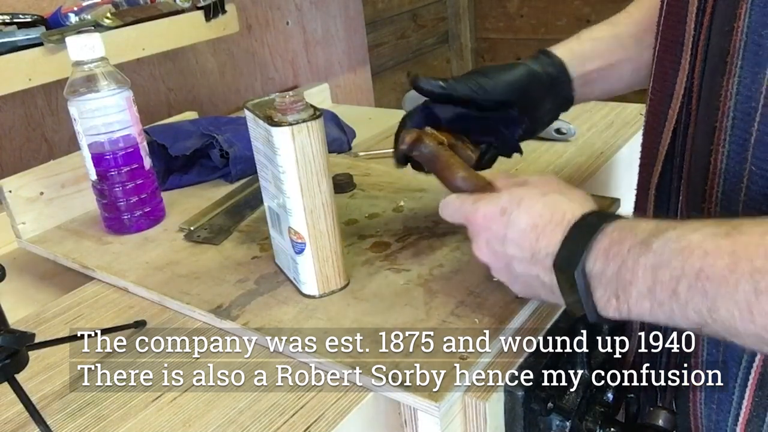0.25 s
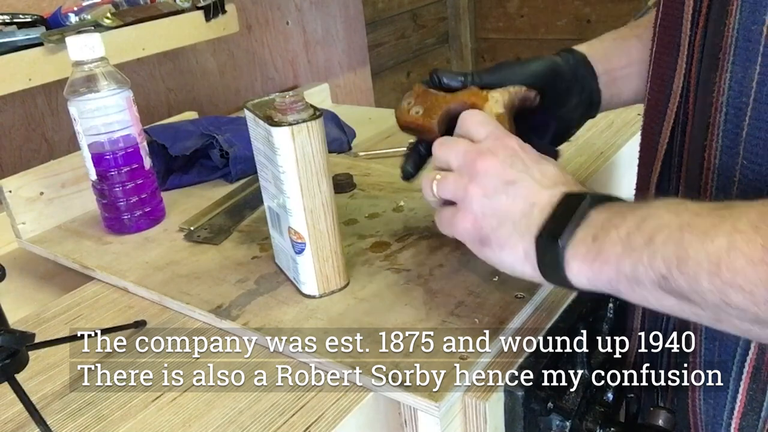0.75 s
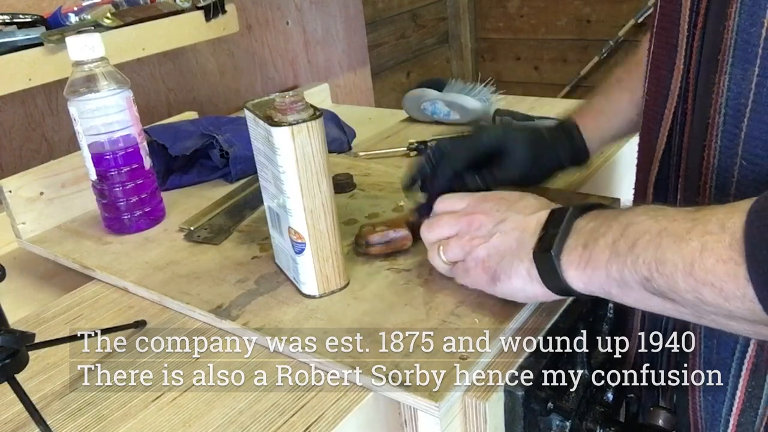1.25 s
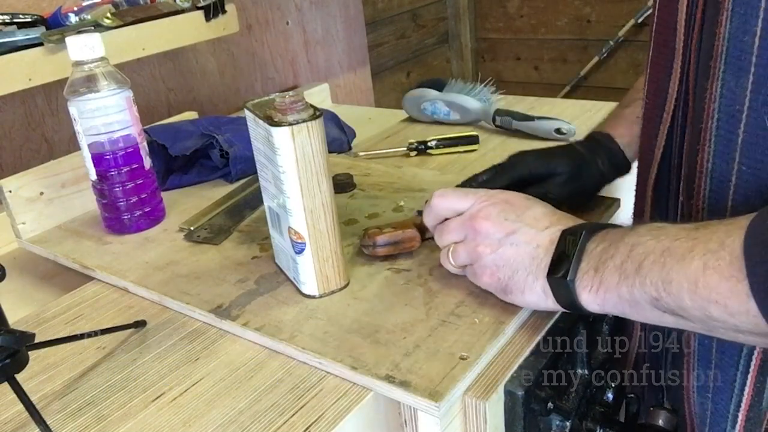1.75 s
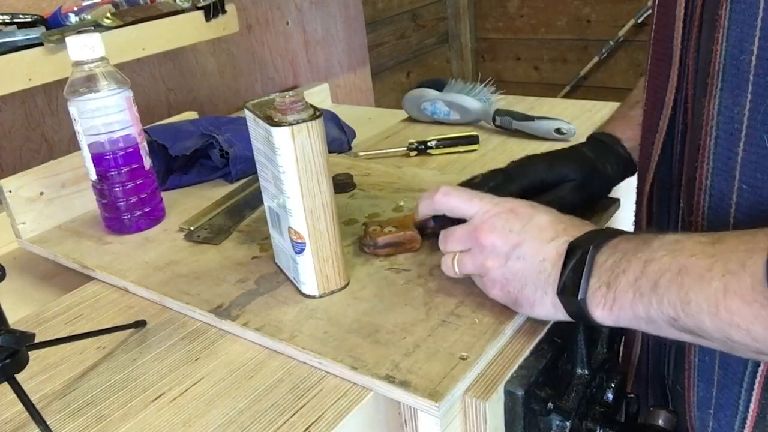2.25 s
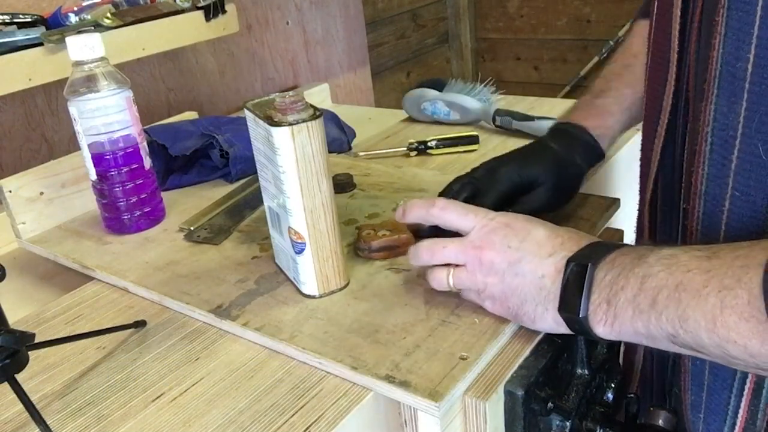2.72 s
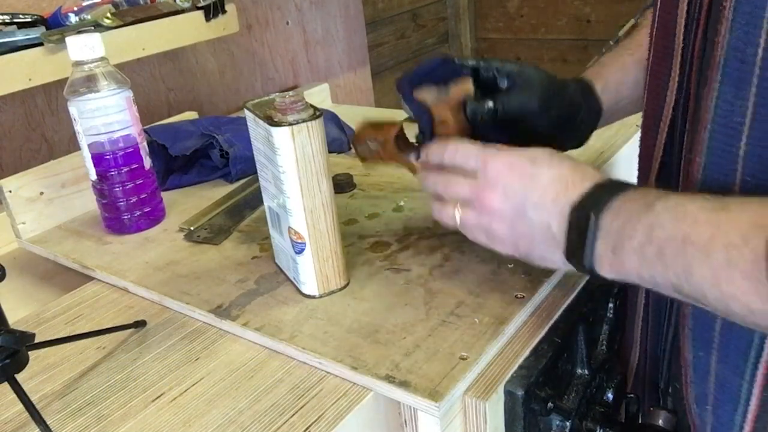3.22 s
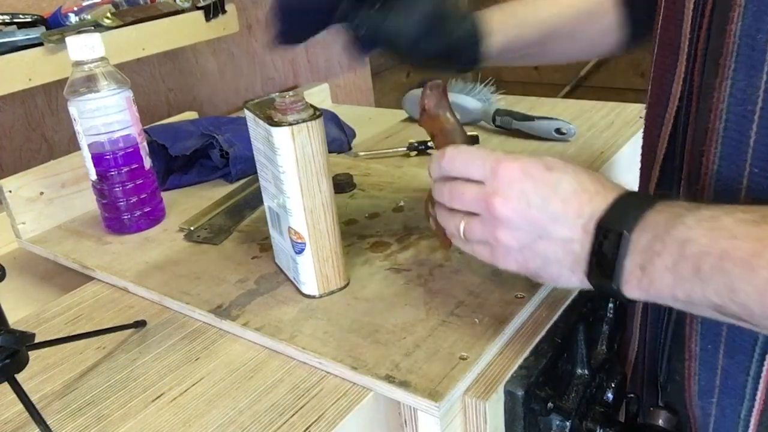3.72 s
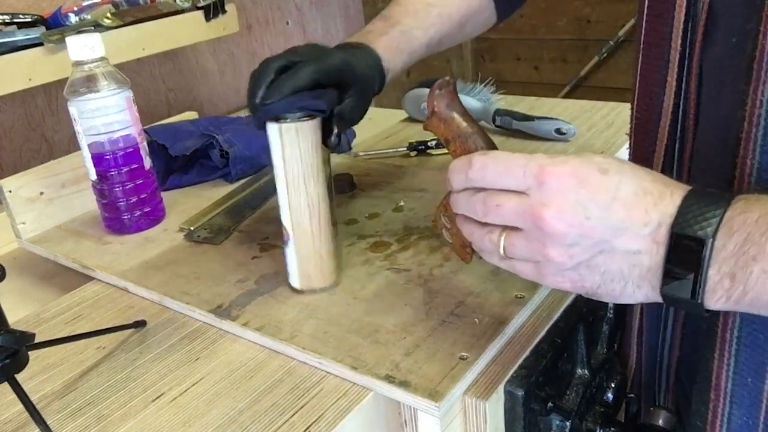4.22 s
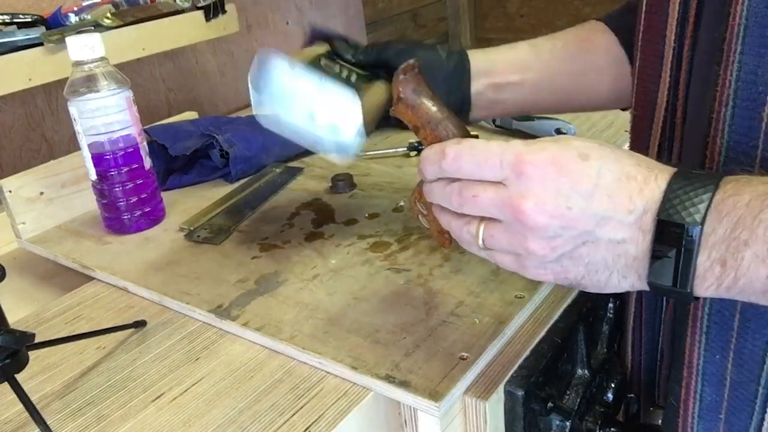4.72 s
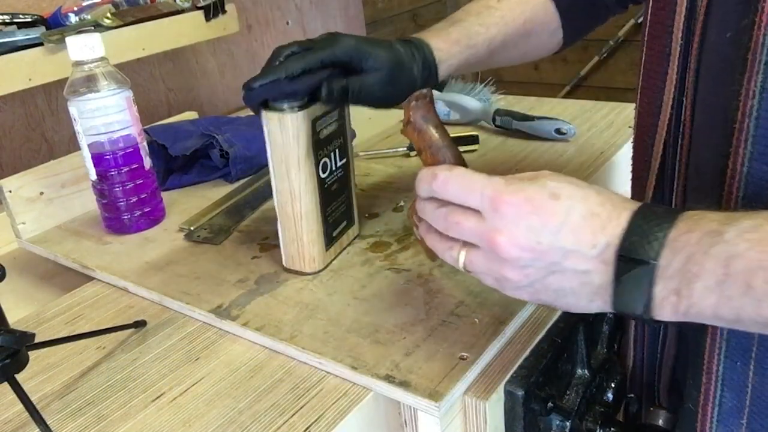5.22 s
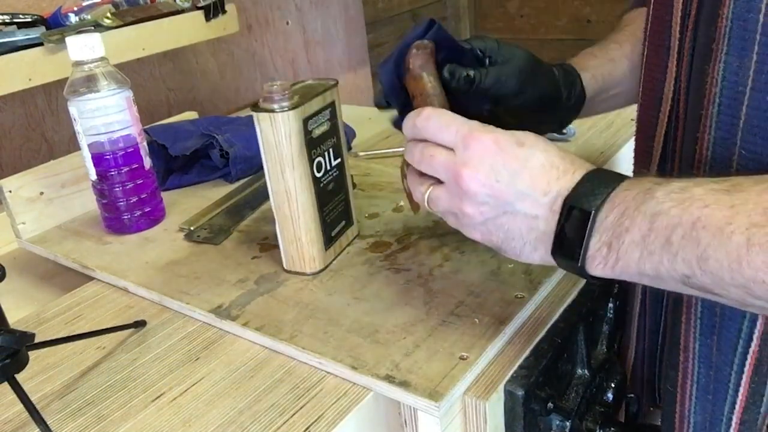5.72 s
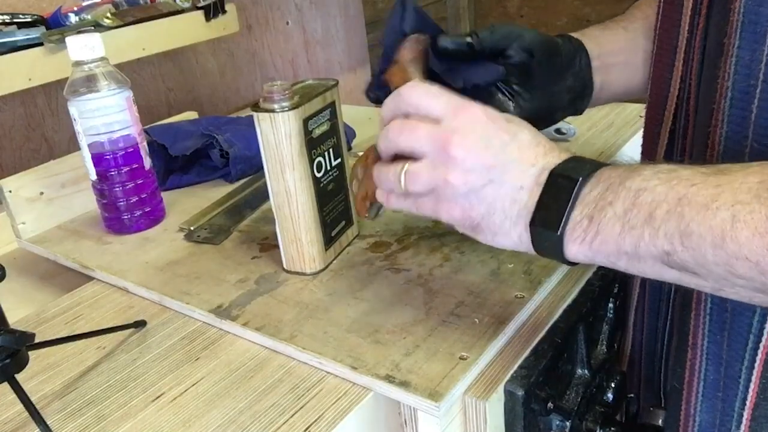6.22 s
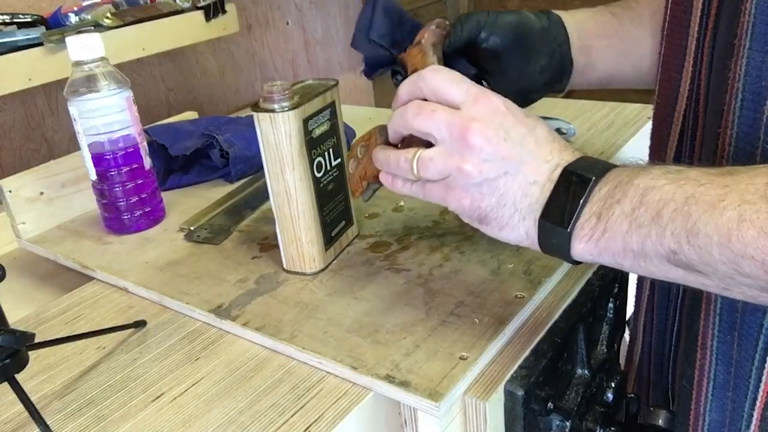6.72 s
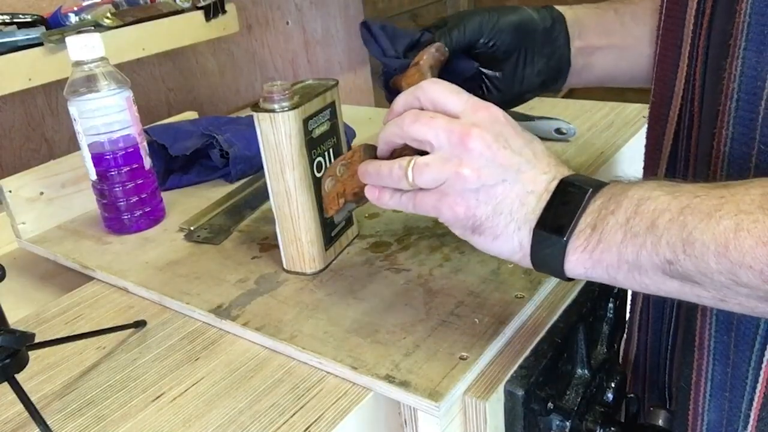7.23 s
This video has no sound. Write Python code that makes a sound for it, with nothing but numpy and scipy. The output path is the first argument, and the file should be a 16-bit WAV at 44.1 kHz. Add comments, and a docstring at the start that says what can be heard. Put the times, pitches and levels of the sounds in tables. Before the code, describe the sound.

A close microphone in a small timber workshop, with a faint, steady, low-weighted room noise throughout. From 0 to 1.2 s a cloth makes soft scratchy strokes on a wooden handle, with little sticky glove pops. At about 1.3 s the handle strikes a plywood bench in a rapid woody clatter with a loose metallic rattle. Brisk, louder rubbing runs from 1.5 to 2.8 s, with small raps and sharp hard knocks near 2.04 and 2.47 s. A light tap comes at 3.0 s, then quiet rustling. Around 3.85 to 4.4 s a tin is touched and gripped with muted bumps and tacky releases. From 4.65 to 5 s oil glugs and gurgles in quick bubbles; at 5.07 s the tin lands with a hard hollow clack, followed by smaller bumps and low sloshing until 5.8 s. Scratchy wiping and glove ticks then continue, strongest around 6.3 s, to the end at 7.4 s.

```python
"""In a small timber workshop, a gloved hand wipes oil into a wooden handle with a cloth.
The handle knocks on a plywood bench; a tin of oil is gripped, tipped so that it glugs, and set down.
Cloth fibres slip in dense tiny snaps, also lent to two hard blows as noise; the oily glove lets go in puffs.
Blows ring the handle, its loose screw, the tin and the bench as sets of decaying modes.
Oil is gliding sines for bubbles and resonant noise for slosh, all over a steady background."""
import sys
import numpy as np
from scipy import signal
from scipy.fft import rfft, irfft, next_fast_len
from scipy.io import wavfile
from scipy.ndimage import uniform_filter1d

SR = 44100
rng = np.random.default_rng(int(sys.argv[2]) if len(sys.argv) > 2 else 0)


def put_to_file(sound):
    """Save the sound as 16-bit audio at rate SR, in the file named by the first command-line argument."""
    columns = np.atleast_2d(sound).T  # one column per channel
    safe = np.clip(columns, -1, 1)
    whole_steps = np.round(safe * 32767)
    wavfile.write(sys.argv[1], SR, whole_steps.astype(np.int16))


N = 328986


def gain_of(db):
    """Turns decibels into a factor."""
    return 10 ** (np.asarray(db) / 20)


def evened(x):
    """Scales a signal to rms 1."""
    return x / np.sqrt(np.mean(x ** 2) + 1e-20)


def read(points, hz):
    """Reads a table of values against pitch, on a log-frequency axis."""
    f, value = np.transpose(points)
    return np.interp(np.log(hz + 1), np.log(f + 1), value)


def add(mix, s, sound):
    """Mixes a sound in at s seconds, cut off where the mix ends."""
    part = mix[round(s * SR):][:len(sound)]
    part += sound[:len(part)]


def coloured(x, gain):
    """Filters x by a gain that is a function of frequency."""
    size = next_fast_len(len(x))
    spectrum = rfft(x, size) * gain(np.fft.rfftfreq(size, 1 / SR))
    return irfft(spectrum, size)[:len(x)]


def resonate(x, hz, width):
    """A gliding resonance of gain 1: shifts the curve hz down to zero, smooths, and shifts back."""
    turn = np.exp(2j * np.pi * np.cumsum(hz) / SR)
    r = np.exp(-np.pi * width / SR)
    return 2 * (turn * signal.lfilter([1 - r], [1, -r], x / turn)).real


def ring(modes, hard_db, spot_db=1.0, contact_s=0.000067, rise_s=0.00036, seconds=.25):
    """Decaying modes, peak 1: a hard blow favours high ones; each spot favours others and sets their signs."""
    hz, db, t60 = np.transpose(modes)[:, :, None]
    spot, detune, side = rng.standard_normal((3, len(modes), 1))
    t = np.arange(round(seconds * SR)) / SR
    start_db = db + hard_db * np.log2(hz / 1000) + spot_db * spot
    size = gain_of(start_db - 60 * t / np.clip(t60, .005, .9))
    tones = np.sin(2 * np.pi * hz * (1 + 0.013 * detune) * t)
    y = (np.sign(side) * size * tones).sum(0) * (1 - np.exp(-t / rise_s))
    push = np.hanning(round(contact_s * SR) + 3)  # a longer contact gives a softer force pulse
    y = np.convolve(y, push)[:len(t)]
    return y / abs(y).max()


# tilt of the workshop background: f/Hz, relative level/dB per Hz
AIR_COLOUR = [(12, -46), (20, -19.5), (53, 0), (153, -10.5), (187, -7.5), (300, -14), (355, -16.5),
              (713, -22), (775, -26), (969, -21.5), (1350, -17), (1840, -24), (2060, -18), (2240, -30),
              (15800, -46)]
AIR_DB = -66.5  # rms before the microphone


def air():
    """The steady background of the workshop: noise of a fixed colour."""
    noise = coloured(rng.standard_normal(N), lambda f: gain_of(read(AIR_COLOUR, f)))
    return gain_of(AIR_DB) * evened(noise)


# cloth strokes, and the noise bursts of the hard blows at 1.29 and 5.071 s: # t/s at full speed, hold/s,
# rise/s, fall/s (both at least 3 ms), hiss level/dB, # rasp level/dB and drag level/dB (both relative to the
# hiss)
STROKES_AND_BURSTS = [(0.014, 0.036, 0.14, 0.08, -55, 3.5, -15), (0.141, 0.034, 0.04, 0.069, -59.5, 6, -8),
                      (0.379, .004, 0.13, 0.057, -60.5, 8.5, 0), (0.44, .004, 0.028, 0.15, -61.5, 11, -7),
                      (0.51, .09, 0.045, 0.077, -64, 8.5, -4), (0.703, .004, 0.045, .12, -68.5, 16, -2),
                      (.778, 0.026, 0.036, .07, -58.5, 8, -10), (.89, .004, 0.071, 0.029, -60.5, 12, -2.5),
                      (1.09, .004, 0.035, 0.089, -69, 11, -2),
                      (1.256, 0.016, 0.044, .05, -64.5, 7.5, -20.5),
                      (1.29, .004, 0.0084, 0.032, -52, -7, 4), (1.321, 0.095, .015, 0.027, -58.5, 5.5, 4.5),
                      (1.501, .004, 0.053, 0.062, -50, 4, -19), (1.544, 0.045, 0.04, .1, -66, 11.5, 13.5),
                      (1.67, 0.0036, 0.074, 0.039, -52, 9, 3), (1.726, 0.042, 0.044, 0.043, -56.5, 5, 6),
                      (1.854, 0.054, .04, 0.037, -54.5, 4, -6.5),
                      (1.973, 0.0036, 0.03, 0.073, -49.5, 7.5, 5),
                      (2.037, 0.081, 0.023, 0.048, -60, 7.5, 10.5),
                      (2.266, 0.041, 0.039, 0.048, -55.5, 6.5, 1), (2.375, 0.046, 0.034, .04, -54, 6.5, -5),
                      (2.493, 0.052, 0.037, 0.057, -57, 6, 3), (2.621, 0.1, 0.022, 0.032, -58.5, 9.5, -1.5),
                      (2.736, 0.033, .03, 0.047, -74.5, 14, 21.5),
                      (2.853, 0.011, 0.094, 0.098, -72.5, 13, 13.5),
                      (2.941, 0.052, 0.05, 0.065, -72, 9.5, 7.5), (3.306, 0.021, 0.063, .1, -73, 4.5, -24),
                      (3.417, 0.037, 0.17, .1, -64.5, 3, -26), (3.504, 0.054, 0.12, .05, -65.5, 4.5, -9.5),
                      (3.594, .04, .05, 0.098, -69, -4, -6), (3.857, 0.1, 0.034, 0.07, -65, 7.5, 0),
                      (4.134, .004, 0.023, .03, -70, 11, 17), (4.244, .004, 0.15, 0.056, -62, 10.5, 12.5),
                      (4.526, 0.0036, 0.018, .012, -74, 8, 7), (4.697, .004, 0.053, 0.033, -72.5, 13, 4),
                      (4.782, 0.0034, 0.013, 0.023, -63, 9, -3),
                      (4.869, 0.0028, 0.089, .025, -60.5, 8, 16.5),
                      (4.945, .004, 0.031, 0.014, -60.5, 9.5, 15),
                      (5.071, 0.0045, 0.018, 0.082, -61.5, 10.5, 15),
                      (5.216, .19, 0.021, 0.055, -70.5, 11.5, 11),
                      (5.596, 0.038, 0.0055, 0.078, -60.5, 6, -3),
                      (5.728, 0.0031, 0.052, 0.017, -55.5, 2, -5),
                      (5.779, .004, 0.068, 0.044, -59.5, 5.5, -12),
                      (5.954, 0.0044, 0.0067, .063, -58.5, 10, -3.5),
                      (6.056, 0.0079, 0.021, 0.033, -77.5, 16.5, 0),
                      (6.145, 0.043, 0.047, 0.048, -56, 6.5, -6),
                      (6.301, 0.038, 0.056, 0.03, -49.5, 7, -5.5),
                      (6.421, .02, 0.042, 0.059, -69.5, 16.5, 4), (6.47, 0.0047, 0.031, 0.052, -53, 6, 5),
                      (6.571, 0.0047, 0.093, 0.062, -62, 7, -3), (6.796, .004, 0.025, 0.029, -61, 11, -24),
                      (6.876, 0.034, 0.042, 0.058, -63.5, 8, -1.5),
                      (6.998, 0.0045, 0.016, 0.042, -54, 5.5, -14), (7.14, .004, 0.037, 0.025, -56, 11, -6),
                      (7.262, 0.0035, 0.06, 0.039, -73, 20, 6), (7.415, .06, 0.12, 0.04, -67, 8, -1)]
EDGE_DB = 20  # a stroke or burst gains this much in its rise time and loses it in its fall time
# faint rustle of the hands under and between the rows above: t/s, fibre hiss level/dB
RUSTLE = [(0, -78), (.33, -78.5), (1.0, -75), (1.2, -79.5), (2.2, -79.5), (2.9, -79), (3.15, -83),
          (3.8, -86), (4.02, -80.5), (4.44, -85.5), (4.6, -87), (5.16, -83.5), (5.5, -91), (5.85, -82.5),
          (6.07, -90), (6.72, -74.5), (7.1, -81), (7.32, -90)]
RUSTLE_RASP_DB, RUSTLE_DRAG_DB = 11.5, -1  # relative to its hiss


def hand():
    """Gains of hiss, rasp and drag: each stroke or burst rises, holds and falls over the rustle; powers add."""
    t = np.arange(0, N + 64, 64) / SR
    s, hold, rise, fall, db, rasp_db, drag_db = np.transpose(STROKES_AND_BURSTS)[:, :, None]
    early = (s - t) / np.maximum(rise, .003)
    late = (t - s - abs(hold)) / np.maximum(fall, .003)
    shape_db = db - EDGE_DB * np.maximum(np.maximum(early, late), 0)
    rustle_db = np.interp(t, *np.transpose(RUSTLE))
    gains = []
    for extra_db, rustle_extra_db in [(0, 0), (rasp_db, RUSTLE_RASP_DB), (drag_db, RUSTLE_DRAG_DB)]:
        shape_power = (gain_of(shape_db + extra_db) ** 2).sum(0)
        rustle_power = gain_of(rustle_db + rustle_extra_db) ** 2
        gains.append(np.interp(np.arange(N) / SR, t, np.sqrt(shape_power + rustle_power)))
    return gains


# colour of the slipping cloth, before its ranges are levelled: f/Hz, relative level/dB per Hz
CLOTH_COLOUR = [(180, -45.5), (300, -8), (545, -5.5), (942, -3.5), (1060, -1), (1290, -2.5), (2120, -4.5),
                (2310, -3.5), (4550, -8), (4870, -12.5), (5840, -6.5), (8410, -12.5), (10400, -17),
                (12900, -14.5), (15800, -22)]
HISS_FROM_HZ, DRAG_UP_TO_HZ = 5920, 1990  # where rasp gives way to hiss above and to drag below


def cloth(slips_per_s=25000, spread_db=0.5, flutter_db=1.7, patchy_db=2.38):
    """Dense slips of uneven size, in three ranges that follow the strokes and bursts by their own amounts."""
    size = gain_of(spread_db * np.minimum(rng.exponential(1, N), 4)) * rng.standard_normal(N)
    slips = size * (rng.random(N) < slips_per_s / SR)
    flutter = evened(uniform_filter1d(rng.standard_normal(N), 300))
    slips *= gain_of(flutter_db * flutter)  # the grip keeps shifting
    hz, _, z = signal.stft(slips, SR, nperseg=512)
    folds = uniform_filter1d(rng.standard_normal(z.shape), 8, 0)
    folds = evened(uniform_filter1d(folds, 10, 1))  # folds shade some pitches
    colour_db = read(CLOTH_COLOUR, hz)[:, None] + patchy_db * folds
    slips = signal.istft(z * gain_of(colour_db), SR, nperseg=512)[1][:N]
    hiss = coloured(slips, lambda f: 1 / (1 + (HISS_FROM_HZ / (f + 1)) ** 8))
    drag = coloured(slips, lambda f: 1 / (1 + (f / DRAG_UP_TO_HZ) ** 4))
    rasp = slips - hiss - drag
    return sum(gain * evened(layer) for gain, layer in zip(hand(), [hiss, rasp, drag]))


# how long the room rings: f/Hz, t60/s
ROOM_T60 = [(100, 0.58), (300, 0.21), (1000, 0.18), (3000, 0.12), (8000, 0.091)]


def shop(x):
    """Room tail: sparse taps of random sign, each band dying at its own speed."""
    taps = np.zeros(SR // 2)
    at = np.arange(130, SR // 2 - 20, 20)  # one tap at a random place in every 20 samples
    taps[at + rng.integers(0, 20, len(at))] = rng.choice([-1., 1.], len(at))
    hz, t, z = signal.stft(taps, SR, nperseg=256)
    decay = gain_of(-60 * t / read(ROOM_T60, hz)[:, None])
    tail = signal.istft(z * decay, SR, nperseg=256)[1]
    return signal.fftconvolve(x, tail / np.linalg.norm(tail))[:N]


# the glove sticks and lets go: t/s, peak level/dB, brightness/dB per octave about 3 kHz
TACKS = [(.256, -52, -2), (.2942, -45.5, -8.5), (.44, -49, -4.5), (.462, -48, 1), (.728, -51, -7.5),
         (1.202, -51, -6.5), (1.83, -72, -4), (1.9535, -39, -7.5), (2.6925, -34, -9), (3.301, -67, 2),
         (3.6444, -54, -17), (3.8462, -41, -7), (4.19, -35, -11.5), (4.326, -49, -6.5), (4.371, -48.5, -8),
         (4.404, -48.5, -8.5), (4.4456, -44.5, -8), (4.531, -60, 0), (4.603, -55, -6), (4.6523, -45, -8),
         (4.766, -50, -19), (4.785, -47.5, -9.5), (5.2051, -43.5, -10), (5.5985, -40.5, -7),
         (5.956, -52, -3), (6.2632, -42.5, -5), (6.4058, -45.5, -9.5), (6.45, -43, -7.5), (6.99, -51, -7),
         (7.135, -47, -7.5), (7.198, -49.5, -8), (7.271, -50, -9)]
TACK_S = .008  # time for a puff to fall to 1/e


def glove():
    """Each release of oily rubber is a puff of noise that starts at once and dies along half a bell curve."""
    out, t = np.zeros(N), np.arange(SR // 10) / SR
    for s, db, bright_db in TACKS:
        def colour(f):
            low_cut = 1 + (1200 / (f + 1)) ** 4
            return gain_of(bright_db * np.log2(f / 3000 + 0.014)) / low_cut
        puff = coloured(rng.standard_normal(len(t)), colour)
        puff *= np.exp(-(t / TACK_S) ** 2)
        add(out, s, gain_of(db) * puff / abs(puff).max())
    return out


# handle blows: t/s, wood peak level/dB, hardness/dB per octave about 1 kHz,
# screw, bench top and bench frame level/dB (each relative to the wood)
KNOCKS = [(0.756, -41, -0.5, -17, -6, -42.5), (1.287, -17.5, -1.5, 8.5, -5, -31.5),
          (1.319, -22.5, -2.5, 13, -1, -27.5), (1.331, -20, 0.5, 7.5, -1, -48),
          (1.3396, -36.5, -2, 9.5, -4, -47), (1.345, -15.5, -9, -28.5, -36, -38),
          (1.351, -22, 1, -20.5, -28.5, -32), (1.466, -27, 1, -28, -6.5, -29),
          (1.474, -26.5, -17, -17, -10, -49.5), (1.705, -35, -11, -20, -1.5, -44),
          (1.985, -33.5, 1, -14.5, -11, -43.5), (2.0356, -28, -6, -31, -8, -48.5),
          (2.0444, -7.5, 6.5, -52, -8.5, -42.5), (2.071, -30, 0, -25.5, -3.5, -48),
          (2.275, -32, 5.5, -22, -8, -47), (2.309, -30.5, 3.5, -19, -9, -56), (2.443, -16, 3, -28, -4, -46),
          (2.474, -7.5, 2, -33, -18.5, -54), (3.006, -28, -6, -39, -15, -48)]
# modes of the wooden handle: f/Hz, relative level/dB, t60/s (at least 5 ms is played)
WOOD = [(666, -11, .03), (740, 4, 0.017), (1004, -4, 0.047), (1250, 6, 0.0081), (1410, 2.5, 0.017),
        (1743, -15.5, 0.0057), (1880, 8, 0.0069), (2610, 5, 0.004), (3000, -30, 0.019),
        (3390, -13.5, 0.042)]
# modes of the loose metal screw in the handle: f/Hz, relative level/dB, t60/s (at least 5 ms is played)
SCREW = [(1760, -6, 0.031), (2910, 5.5, 0.0033), (4000, -10, 0.0067), (4745, 10.5, 0.0046),
         (5100, 2, 0.0062), (5860, -10.5, 0.011), (7220, -0.5, 0.0064)]


def handle():
    """Each knock rings the wood, rattles the screw and drives the bench."""
    out = np.zeros(N)
    for s, db, hard_db, screw_db, top_db, frame_db in KNOCKS:
        wood = ring(WOOD, hard_db)
        screw = gain_of(screw_db) * ring(SCREW, 0, contact_s=.0001)
        under = bench(hard_db + 2.5, top_db, frame_db)  # a light thing hardly moves the low modes
        add(out, s, gain_of(db) * (wood + screw))
        add(out, s, gain_of(db) * under)
    return out


# level curve over the modes of the plywood top: f/Hz, relative level/dB
BENCH_COLOUR = [(88, -32), (150, -8), (378, -5), (500, -11.5), (620, -8.5), (1070, -14), (1230, -5.5),
                (1350, -17.5), (1600, -7.5), (2860, -19), (3090, -19.5), (4540, -31), (15000, -72.5)]
# how long the plywood top rings: f/Hz, t60/s
BENCH_T60 = [(100, 0.036), (400, 0.16), (1500, 0.035), (6000, 0.021), (14000, .05)]
# the whole bench on its legs: f/Hz, relative level/dB, t60/s
FRAME = [(75, 0, .8), (102, -9, .2), (131, -8, .25)]


def bench(hard_db, top_db, frame_db, count=200):
    """The plywood top has modes too close to tell apart; the frame adds a slow, low thud."""
    hz = np.linspace(np.sqrt(180), np.sqrt(14500), count) ** 2
    hz = hz * gain_of(.3 * rng.standard_normal(count))  # scatters the pitches
    top = np.transpose([hz, read(BENCH_COLOUR, hz), read(BENCH_T60, hz)])
    out = gain_of(frame_db) * ring(FRAME, 0, contact_s=.006, spot_db=0, seconds=.6)
    add(out, 0, gain_of(top_db) * ring(top, hard_db, spot_db=4.5, contact_s=0.00016))
    return out


# the oil is jolted and settles: t/s, length/s, starting level/dB, fade/dB, from f/Hz, to f/Hz
SLOSHES = [(3.849, 0.22, -58, -13, 262, 221), (4.932, .12, -47.5, -20, 300, 272),
           (5.328, .31, -47, -8, 280, 234), (5.649, 0.178, -63, -8.5, 248, 230)]
SURGE_DB, SURGE_S = 2.5, 0.012  # rms swing as the oil surges at random, and its smoothing time


def slosh():
    """Jolted oil is noise through a gliding resonance: the air space of the tin."""
    out = np.zeros(N)
    for s, length, db, fade_db, from_hz, to_hz in SLOSHES:
        u = np.linspace(0, 1, round(length * SR))
        hz = from_hz + (to_hz - from_hz) * u
        noise = resonate(rng.standard_normal(len(u)), hz, 130.)
        noise = evened(resonate(noise, hz, 130.))
        surge = evened(uniform_filter1d(rng.standard_normal(len(u)), round(SURGE_S * SR)))
        level = gain_of(db + fade_db * u + SURGE_DB * surge)
        add(out, s, level * noise * signal.windows.tukey(len(u), .05))
    return out


# tin blows: t/s, tin peak level/dB, hardness/dB per octave about 1 kHz,
# bench top and bench frame level/dB (both relative to the tin)
BUMPS = [(3.86, -45, 8, 5, -4), (3.935, -63, 2, -1, -20), (4.141, -28, 2.5, 6.5, -14.5),
         (4.248, -53.5, -3.5, 15, -35), (4.325, -53.5, 3.5, 8, -29), (4.84, -41, 8, 1, -32.5),
         (5.07, -12.5, 7.5, 2.5, -22.5), (5.098, -26.5, 6.5, 3.5, -17), (5.282, -27.5, 3.5, 8.5, -32),
         (5.316, -43, 0.5, 12.5, -23), (5.388, -40.5, -3, 6, -15)]
# modes of the half-full, hand-damped tin: f/Hz, relative level/dB, t60/s
TIN = [(241, 5, 0.08), (374, -3, 0.17), (569, -11, 0.086), (1001, -26, 0.0074), (1044, -2.5, 0.016),
       (1546, -16.5, 0.042), (2057, -18, 0.042), (2880, -40.5, .015)]


def tin():
    """Each bump rings the tin walls and drives the bench."""
    out = np.zeros(N)
    for s, db, hard_db, top_db, frame_db in BUMPS:
        add(out, s, gain_of(db) * ring(TIN, hard_db, contact_s=0.000083))
        add(out, s, gain_of(db) * bench(hard_db, top_db, frame_db))
    return out


# air bubbles rising in the tin: t/s, level/dB before the decay, starting f/Hz, rise as a share of f
GLUGS = [(4.657, -53, 5500, .05), (4.667, -38, 262, .25), (4.783, -39, 5930, 0.04),
         (4.812, -51, 1620, 0.076), (4.828, -48, 6560, .05), (4.834, -44, 4100, .08),
         (4.838, -39, 1030, .05), (4.837, -39.5, 317, 0.06), (4.863, -55, 5600, 0.055),
         (4.867, -43, 245.5, 0.08), (4.876, -40, 2310, 0.033), (4.893, -38.5, 3780, .14),
         (4.918, -41.5, 955, 0.092), (4.935, -38.5, 1640, 0.021)]
BUBBLE_CYCLES = 80  # a bubble dies by 60 dB in this many cycles of its starting pitch
LONGEST_BUBBLE_S = 0.069  # a bubble bursts by then


def glugs():
    """Each bubble is a decaying sine that rises in pitch as it nears the surface."""
    out, t = np.zeros(N), np.arange(round(LONGEST_BUBBLE_S * SR)) / SR
    for s, db, hz, rise in GLUGS:
        glide = 1 + rise * (1 - np.exp(-t * hz / 6))  # takes a few cycles
        turns = np.cumsum(hz * glide) / SR
        decay = gain_of(db - 60 * t * hz / BUBBLE_CYCLES)
        onset, end = 1 - np.exp(-t * hz), np.minimum((t[-1] - t) / 0.0063, 1)
        add(out, s, decay * onset * end * np.sin(2 * np.pi * turns))
    return out


# small bubbles as the oil runs back: t/s, level/dB, joined by straight lines
GURGLE_LEVEL = [(4.76, -67), (4.768, -63), (4.836, -57), (4.844, -66.5), (4.91, -50), (4.942, -50),
                (5.02, -60.5)]


def gurgle(per_s=1900, cycles=5., count=24):
    """Many small bubbles of unlike size, each a few cycles that glide upward."""
    s, db = np.transpose(GURGLE_LEVEL)
    u = np.arange(s[0], s[-1], 1 / SR)
    out, t = np.zeros(len(u)), np.arange(SR // 40) / SR
    for hz in np.geomspace(600, 6000, count):
        tone = np.sin(2 * np.pi * hz * t * (1 + 0.036 * hz * t))
        pop = tone * np.exp(-hz * t / cycles * 3) * (1 - np.exp(-hz * t))
        births = rng.random(len(u)) < per_s / count / SR
        births = gain_of(2.5 * rng.exponential(1, len(u))) * births
        out += gain_of(-1.5 * np.log2(hz / 1000)) * signal.oaconvolve(births, pop)[:len(u)]
    mix = np.zeros(N)
    level = gain_of(np.interp(u, s, db))
    add(mix, s[0], level * evened(out) * signal.windows.tukey(len(u), .1))
    return mix


def scene():
    """Blows, cloth and oil, each sent to the room by its own amount, over the background."""
    rub = cloth() + glove()
    blows = handle() + tin()
    liquid = slosh() + glugs() + gurgle()
    room = shop(gain_of(-8.5) * blows + gain_of(-12) * rub + gain_of(-16) * liquid)
    return (blows + rub + liquid + room + air())[None]


EDGE_HZ = 15900  # top of the recorder's band


def record(dry):
    """The microphone loses the lowest bass; then the band limit of the recorder."""
    bass_cut = signal.butter(3, 48., "highpass", fs=SR, output="sos")
    thinned = signal.sosfilt(bass_cut, dry)
    band_limit = signal.firwin(511, EDGE_HZ, window=("kaiser", 9), fs=SR)
    return signal.oaconvolve(thinned, band_limit[None], "same")


dry = scene()
out = record(dry)
put_to_file(out)
```